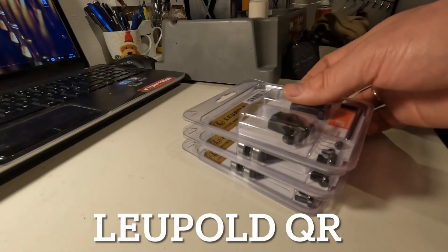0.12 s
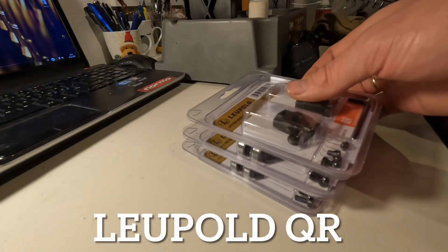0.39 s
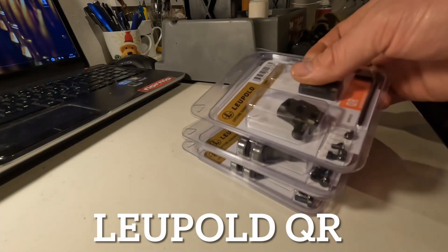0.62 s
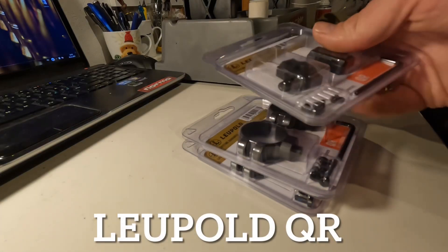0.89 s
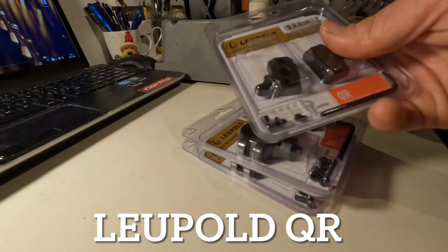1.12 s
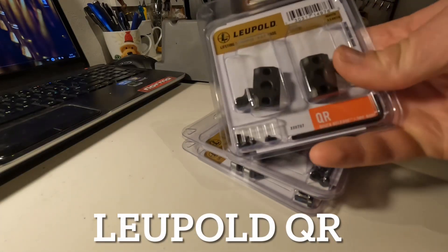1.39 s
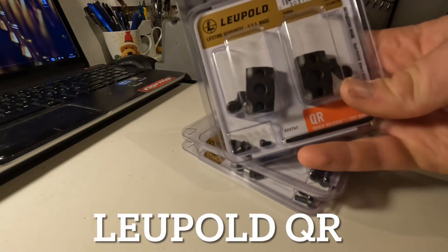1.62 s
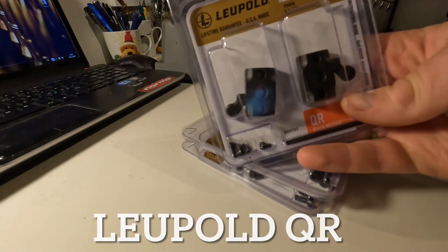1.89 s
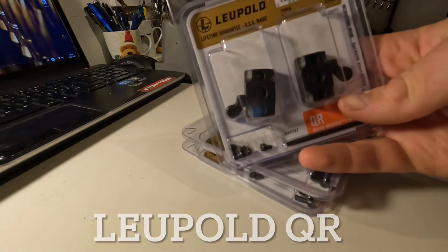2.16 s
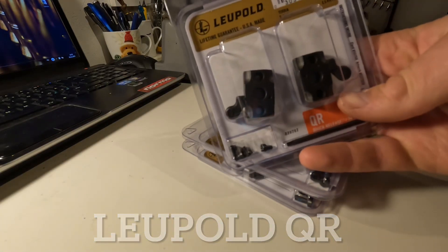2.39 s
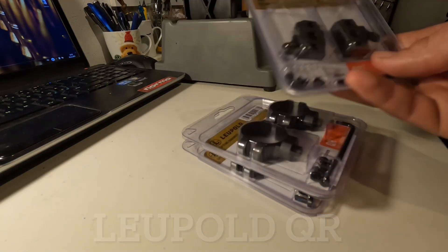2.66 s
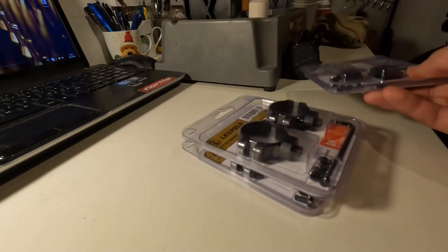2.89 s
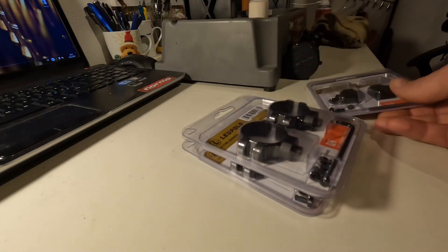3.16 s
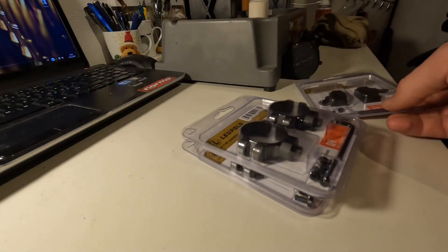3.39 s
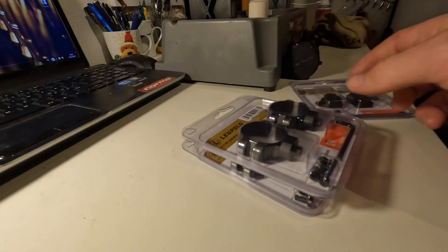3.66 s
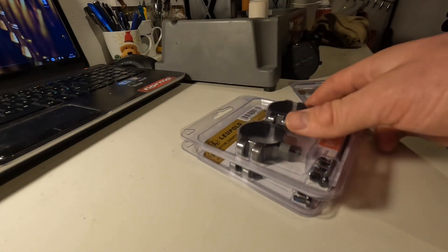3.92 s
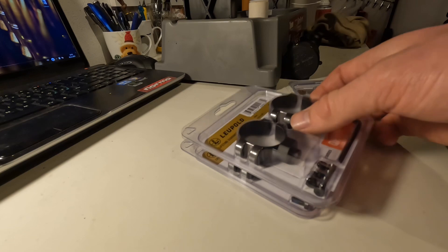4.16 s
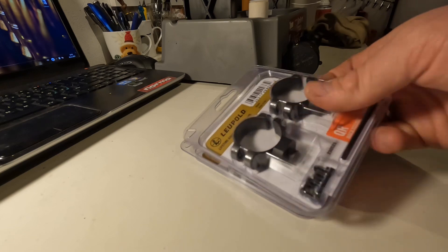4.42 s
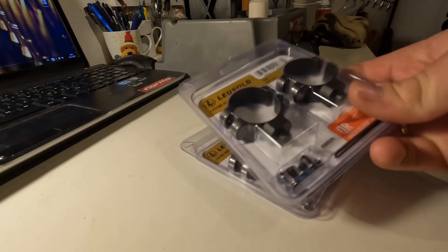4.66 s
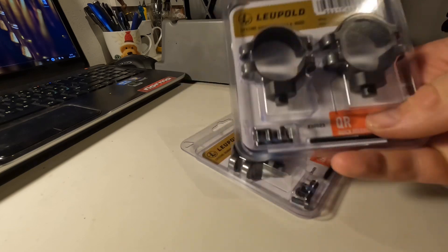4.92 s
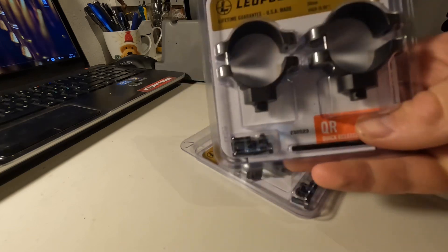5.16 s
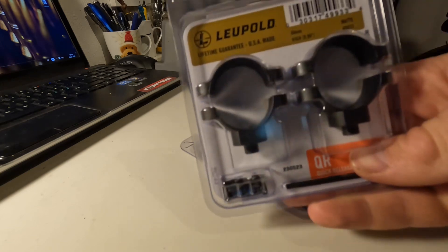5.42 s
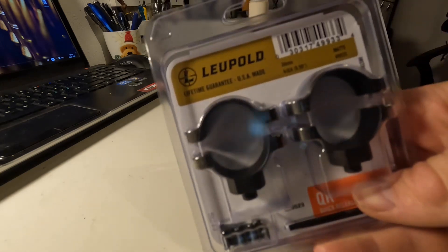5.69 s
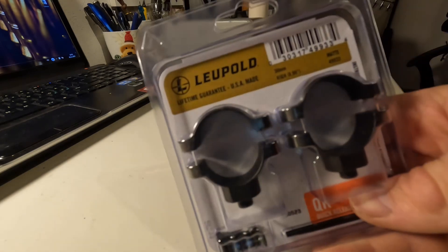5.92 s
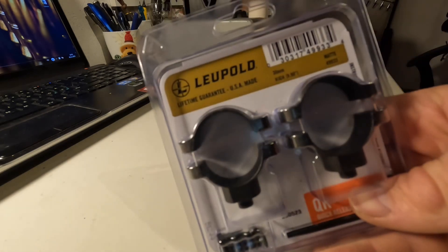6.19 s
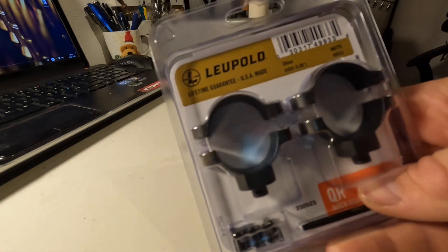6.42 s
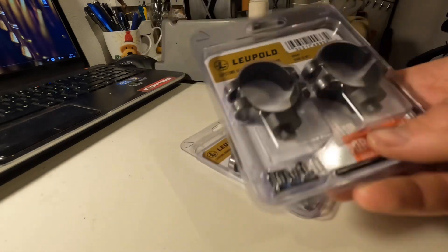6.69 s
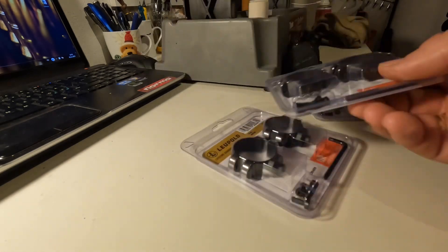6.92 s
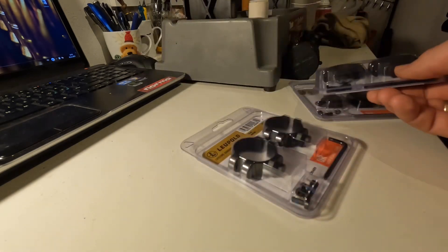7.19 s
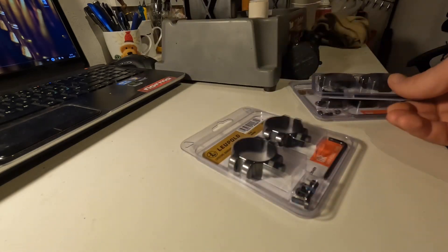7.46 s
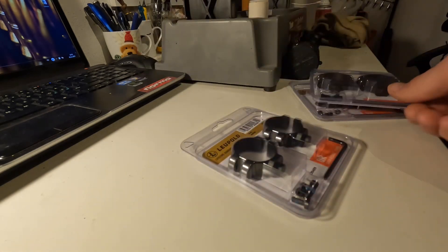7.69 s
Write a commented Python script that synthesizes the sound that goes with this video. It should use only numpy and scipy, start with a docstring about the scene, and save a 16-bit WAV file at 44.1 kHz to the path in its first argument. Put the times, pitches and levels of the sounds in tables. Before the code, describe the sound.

A close stereo microphone at a desk in a small, fairly dry room, with faint fan air throughout. From 0 to 0.5 s fingers rub and lightly scrape stiff plastic with small ticks. Between about 0.55 and 1.5 s the pack is lifted and turned in a dense flurry of bright, brittle clicks and crackles with soft desk bumps. This thins to near quiet by 2 s, with a lone click around 2.6. At 3.05 to 3.3 s hard plastic clacks and rubs arrive as it is laid down, then the loudest clack with a deep desk knock at 3.5. From 3.95 to 5 s a second pack is picked up with snaps, scrapes and crackling, leaving a low hum in the desk. It is almost silent from 5.4 to 6.5, then skin rubs softly around 6.65. A sharp clack and thud come at 7.3, and another weighty knock with clicks at 7.65.

```python
"""At a desk, close to a small stereo microphone: stiff plastic blister packs are lifted, turned and laid down.
Panels snap: short runs of slips with one sharp click, heard through the shell's colour and two brief rings.
Fingers and shells rub, crackle and scrape: dense random slips, coloured by plastic and skin.
Knocks ring the desk's modes and its frame hums on at one low pitch, over lumpy low noise from hands and arms.
A fan nearby is coloured noise with two faint wavering tones; sparse reflections make the room."""
import sys
import numpy as np
from scipy import signal
from scipy.fft import rfft, irfft
from scipy.io import wavfile
from scipy.ndimage import uniform_filter1d

SR = 44100
rng = np.random.default_rng(int(sys.argv[2]) if len(sys.argv) > 2 else 0)


def materialize(psi):
    """Save the field psi as 16-bit PCM at rate SR to the path in sys.argv[1].

    A 1-D psi becomes a single channel; in a 2-D psi each row is a channel.
    """
    bounded = np.clip(np.atleast_2d(psi).T, -1, 1)
    quanta = np.round(bounded * 32767).astype(np.int16)
    wavfile.write(sys.argv[1], SR, quanta)


def gain_from_decibels(decibels):
    """Convert decibel values to linear amplitude factors."""
    exponent = np.asarray(decibels, float) / 20
    return 10 ** exponent


N = 344862  # length in samples

# Side of the handled pack and how bright its snaps sound over time.
# Each row: time in seconds, left over right in dB, tilt of the snaps in dB an octave.
PLACE = [(0, -17, -16), (.5, 7, 1.9), (2.6, 0, -8.6), (3, -1, 4), (3.4, -1.5, -1.5), (3.7, 1, 3),
         (4.1, -2, -3.3), (4.5, -2, -1), (5.3, -1, -3.5), (6, 4, -0.5), (6.8, -1.5, -8), (7.3, -1.5, 3.5),
         (7.82, -2, -1)]
# How firmly the fingers work the pack between strokes. Each row: time in seconds, grip in dB.
GRIP = [(0, -73.5), (.2, -64), (.45, -63.5), (.9, -69), (1.7, -70), (1.95, -72.5), (2.5, -89), (2.75, -71),
        (3.5, -60.5), (3.62, -85), (3.93, -77), (4.4, -61.5), (5.1, -67), (5.35, -75.5), (6.4, -71.5),
        (6.7, -64), (7.2, -68), (7.6, -61), (7.82, -73)]
# Colour of the plastic shell. Each row: frequency in Hz, relative density in dB per Hz.
SHELL = [(180, -43), (300, -8), (543, -11), (1050, -4), (1420, -5.5), (1620, -6.5), (1970, -3.5),
         (2440, -0.5), (2930, -5), (3810, -4.5), (7500, -22), (8990, -21.5), (15500, -39.5)]


def evened(x):
    """Scales to rms 1."""
    return x / np.sqrt(np.mean(x ** 2) + 1e-20)


def read(points, hz):
    """Reads a table along log frequency."""
    f, value = np.transpose(points)
    return np.interp(np.log(hz + 1), np.log(f + 1), value)


def curves(rows):
    """Every column of a table at every sample."""
    s, *columns = np.transpose(rows)
    return [np.interp(np.arange(N) / SR, s, c) for c in columns]


def add(mix, s, sound):
    """Mixes a sound in at time s."""
    part = mix[max(round(s * SR), 0):][:len(sound)]
    part += sound[:len(part)]


def ring(x, hz, width_hz):
    """One resonance of gain 1 at its centre."""
    return signal.lfilter(*signal.iirpeak(hz, hz / max(width_hz, 1), SR), x)


def colour(points, tilt_db=0):
    """Causal impulse response of a spectrum, tilted per octave about 2 kHz."""
    hz = np.abs(np.fft.fftfreq(4096, 1 / SR))
    level_db = read(points, hz) + tilt_db * np.log2((hz + 50) / 2000)
    log_gain = np.log(gain_from_decibels(np.maximum(level_db, -100)))
    minimum_phase = -signal.hilbert(log_gain).imag
    return np.fft.ifft(np.exp(log_gain + 1j * minimum_phase)).real[:1024]


def snaps():
    """A panel flips: quick slips swell to one sharp click and die; two short rings over the shell's colour."""
    # Each row: time of the click in seconds, peak in dB at the pack, ring of the large panel in Hz,
    # ring of a small dome in Hz, dome over panel in dB.
    snap_rows = [(.257, -40, 1840, 5700, 9), (0.329, -52, 1400, 6900, 6), (0.408, -40.5, 1760, 4070, 20),
                 (.428, -39.5, 1410, 2150, -20), (.444, -39, 880, 2580, -17), (.565, -32.5, 1370, 3070, -3),
                 (.572, -33.5, 610, 3220, -17), (.625, -39, 1350, 3700, -17),
                 (.648, -31.5, 1170, 3460, -17), (.712, -29, 760, 2450, -9), (.724, -27, 1240, 2600, -3),
                 (.737, -21.5, 696, 2600, 3), (.767, -30, 1040, 2410, -22), (0.8, -34, 866, 3140, -13),
                 (.813, -21.5, 1340, 3360, 5.5), (0.88, -28.5, 1170, 4140, 17),
                 (.891, -27.5, 930, 3470, 8.5), (.991, -26.5, 1190, 2600, 4), (1, -31, 1000, 2840, -17),
                 (1.051, -44, 1210, 4770, 24), (1.124, -27.5, 800, 2560, -2), (1.149, -31, 1430, 3290, 21),
                 (1.176, -32.5, 690, 4540, 6), (1.187, -26.5, 1380, 4050, 21),
                 (1.204, -35.5, 1960, 2770, 25), (1.299, -31.5, 830, 2700, 0.5),
                 (1.417, -41.5, 740, 2770, -14), (1.438, -33.5, 1400, 4040, 55),
                 (1.529, -32.5, 575, 2120, -6), (1.587, -45, 1650, 3240, -10),
                 (1.625, -41.5, 1630, 3060, -12), (1.708, -41.5, 1240, 3950, 13),
                 (1.844, -50.5, 610, 2590, -30), (1.892, -45.5, 600, 5350, -7),
                 (1.966, -50.5, 1540, 2190, -37), (2.58, -32.5, 1480, 2530, 10),
                 (2.849, -33, 1410, 3160, 0), (2.919, -40.5, 1370, 2870, -12.5),
                 (2.931, -46, 1120, 2170, -23), (3.05, -12, 1330, 2170, -23.5),
                 (3.058, -21, 1330, 2300, -16.5), (3.075, -26.5, 1060, 3450, -19),
                 (3.096, -25, 980, 2360, 1), (3.188, -21, 1610, 2340, -11), (3.206, -32, 490, 2300, -18),
                 (3.276, -16.5, 1280, 2400, -2), (3.283, -23, 1450, 2600, -31),
                 (3.304, -26, 1260, 2490, -8), (3.429, -33.5, 980, 2340, -14),
                 (3.449, -30, 1020, 2600, -20), (3.474, -24.5, 1000, 3020, -4),
                 (3.488, -20.5, 1040, 3030, -5), (3.5125, -4, 1210, 2800, 6.5),
                 (3.941, -39.5, 1210, 2580, 1), (3.967, -28, 760, 2030, 5), (4.015, -28.5, 880, 2940, 15),
                 (4.034, -24, 1050, 3270, -3), (4.05, -23.5, 590, 3280, 0), (4.058, -29, 465, 2150, -12),
                 (4.092, -40, 580, 5100, -5), (4.137, -38.5, 1670, 2920, -4), (4.202, -25.5, 1460, 3240, 6),
                 (4.225, -22.5, 990, 1950, -7), (4.303, -43, 1210, 3700, 37), (4.338, -40, 2010, 2140, -9),
                 (4.373, -39.5, 600, 2260, -1), (4.44, -37, 1100, 2920, 1), (4.477, -32, 900, 3780, -15),
                 (4.493, -25.5, 965, 3980, 27), (4.511, -29, 1040, 3200, -7), (4.567, -41, 1120, 3620, -14),
                 (4.581, -34, 1050, 3630, -2), (4.636, -39, 1240, 3380, 15), (4.719, -28, 970, 3500, 14),
                 (4.75, -26.5, 860, 2470, -3), (4.864, -40.5, 1263, 4800, -5), (4.872, -32, 1220, 2330, 10),
                 (4.884, -22.5, 1030, 3670, 27), (4.957, -39, 1230, 2730, 5), (5.118, -48, 1380, 2470, 14),
                 (5.133, -33.5, 1086, 3010, 7.5), (5.24, -36.5, 1230, 2920, 6),
                 (5.284, -46, 1228, 2240, -4), (5.355, -44.5, 1434, 3500, -1),
                 (5.415, -49.5, 960, 2030, -35), (6.146, -46, 700, 3000, -10.5),
                 (6.95, -39.5, 875, 2226, -38), (6.967, -43, 1220, 3920, -20),
                 (7.316, -11.5, 1420, 3570, 4.5), (7.332, -19.5, 1440, 2440, -8),
                 (7.348, -28, 1370, 3400, -13), (7.369, -25.5, 875, 2830, -20),
                 (7.491, -30, 1760, 2700, -21), (7.511, -36.5, 1670, 2480, 20), (7.62, -30, 1020, 2120, 14),
                 (7.636, -23.5, 1030, 2030, -15), (7.646, -28.5, 960, 2480, -27),
                 (7.663, -47, 576, 2420, -2)]
    slip_t60_s, dull_per_db = 0.022, 0.5  # harder snaps move more shell and sound duller: dB an octave per dB
    out, t, bright_db = np.zeros(N), np.arange(5000) / SR - 0.012, curves(PLACE)[1]
    swell_and_decay = gain_from_decibels(-60 * np.where(t < 0, -t / (0.37 * slip_t60_s), t / slip_t60_s))
    for s, db, panel_hz, dome_hz, dome_db in snap_rows:
        slips = rng.standard_normal(len(t)) * gain_from_decibels(5.08 * np.minimum(rng.exponential(1, len(t)), 4))
        drive = 0.19 * evened(slips) * swell_and_decay
        drive[np.argmax(t >= 0)] += 1  # the click
        tilt_db = 0.24 * (dome_db + 6.0) - dull_per_db * (db + 29) + bright_db[round(s * SR)]
        broad = signal.oaconvolve(drive, colour(SHELL, tilt_db))[:len(t)]
        panel = ring(ring(drive, panel_hz, 0.22 * panel_hz), panel_hz, 1.7 * panel_hz)
        dome = ring(ring(drive, dome_hz, 810), dome_hz, 1080)
        sound = 1.9 * evened(broad) + gain_from_decibels(-dome_db / 2) * evened(panel) + gain_from_decibels(dome_db / 2) * evened(dome)
        add(out, s + t[0], gain_from_decibels(db) * sound / abs(sound).max())
    return out


def grit(count, clump_db, spread_db):
    """Dense tiny slips of uneven size, in clumps."""
    clumps = evened(uniform_filter1d(rng.standard_normal(count), 300))
    size_db = clump_db * clumps + spread_db * np.minimum(rng.exponential(1, count), 5)
    return rng.standard_normal(count) * gain_from_decibels(size_db)


def strokes():
    """Levels of shell and skin: the steady grip plus a swell for each stroke, summed as power."""
    # Single rubs and rattles. Each row: time of the peak in seconds, rise in seconds, fall in seconds,
    # shell level in dB, skin level in dB.
    stroke_rows = [(0.127, .05, 0.08, -47.5, -41), (.274, 0.061, 0.072, -68, -51.5),
                   (.58, .05, 0.14, -61, -55), (.688, 0.54, 0.069, -52.5, -64),
                   (.735, 0.11, 0.37, -48.5, -51), (.88, 0.051, 0.063, -52, -48),
                   (1.003, 0.16, 0.14, -54.5, -52), (1.14, 0.13, 0.48, -57, -52),
                   (1.312, 0.087, 0.038, -64, -67), (1.432, 0.17, 0.19, -57.5, -61.5),
                   (1.537, 0.15, 0.22, -60, -57), (1.74, 0.36, 0.16, -86, -62),
                   (2.59, 0.16, 0.31, -58, -57.5), (2.93, 0.65, 0.2, -62, -61.5),
                   (3.061, 0.03, 0.09, -34, -46), (3.198, 0.025, 0.055, -42, -55),
                   (3.296, 0.055, 0.082, -39, -51), (3.467, 0.34, 0.041, -48.5, -79),
                   (3.52, 0.12, 0.15, -31.5, -67), (4.042, 0.11, 0.033, -38.5, -46.5),
                   (4.226, 0.017, 0.04, -33, -64), (4.494, 0.13, 0.072, -51.5, -48),
                   (4.755, 0.32, 0.051, -55.5, -51.5), (4.93, 0.074, 0.6, -73, -63.5),
                   (6.646, 0.14, 0.1, -52.5, -48.5), (6.779, 0.28, 0.1, -58.5, -54),
                   (6.959, 0.3, 0.072, -59, -60.5), (7.35, 0.03, 0.061, -32, -64),
                   (7.508, 0.039, 0.33, -58, -54.5), (7.655, 0.1, 0.057, -36.5, -46)]
    depth_db = 32  # a stroke is this far down one rise before and one fall after its peak
    t, grip = np.arange(N) / SR, gain_from_decibels(curves(GRIP)[0])
    shell, skin = grip ** 2, (grip * gain_from_decibels(-3)) ** 2
    for s, rise, fall, shell_db, skin_db in stroke_rows:
        swell_db = -depth_db * np.where(t < s, (s - t) / max(rise, 0.005), (t - s) / max(fall, 0.005))
        shell = shell + gain_from_decibels(2 * (shell_db + swell_db))
        skin = skin + gain_from_decibels(2 * (skin_db + swell_db))
    return np.sqrt(shell), np.sqrt(skin)


def rub():
    """Slips heard through the shell; skin sliding on plastic hisses above."""
    # Resonances of the rubbed shell. Each row: frequency in Hz, width in Hz, gain in dB.
    shell_rings = [(1060, 1300, 15.5), (2470, 12, 16.5), (4014, 1440, -30)]
    # Colour of skin on plastic. Each row: frequency in Hz, relative density in dB per Hz.
    skin_colour = [(1500, -41), (3500, 7), (6000, -3), (9000, -9.5), (11500, -14.5), (15500, -36)]
    shell_level, skin_level = strokes()
    slips = grit(count=N, clump_db=2.5, spread_db=4.0)
    # neighbouring rings have opposite sign
    rings = sum((-1) ** k * gain_from_decibels(db) * ring(slips, hz, width) for k, (hz, width, db) in enumerate(shell_rings))
    body = evened(signal.oaconvolve(slips, colour(SHELL, -0.086))[:N]) + 0.5 * evened(rings)
    # the thick shell carries little treble
    body = signal.sosfilt(signal.butter(2, 4500, fs=SR, output="sos"), body)
    skin_slips = slips + 4.0 * grit(count=N, clump_db=1.0, spread_db=4.0)
    skin = signal.oaconvolve(skin_slips, colour(skin_colour))[:N]
    return shell_level * evened(body) + skin_level * evened(skin)


def crackle():
    """Small chance ticks of the flexing shell, each through one short ring, as loud as the grip is firm."""
    ticks_per_s = 140
    size_db = 18 + curves(GRIP)[0] + 4.5 * np.minimum(rng.exponential(1, N), 3)
    ticks = gain_from_decibels(size_db) * (rng.random(N) < ticks_per_s / SR)
    spot = rng.integers(0, 6, N)  # which of six pitches each tick excites
    out = np.zeros(N)
    for k, hz in enumerate(np.geomspace(800, 4500, num=6)):
        out += 3 * ring(ring(ticks * (spot == k), hz, 0.28 * hz), hz, 0.49 * hz)
    return out


def scrapes():
    """An edge slides and sings: slips through one gliding resonance, wider for a higher starting pitch."""
    # Each row: start in seconds, length in seconds, level in dB, pitch at the start in Hz, at the end in Hz.
    scrape_rows = [(0.09, 0.068, -45.5, 3110, 2740), (0.098, 0.07, -52.5, 1660, 1530),
                   (0.346, .06, -58.5, 1510, 1670), (.6, 0.06, -56, 3800, 4200),
                   (4.559, 0.035, -60, 1075, 1140), (3.979, .06, -52.5, 3350, 3020),
                   (4.607, 0.11, -51, 3540, 3680), (4.699, 0.092, -61, 5270, 5200),
                   (4.857, .064, -61.5, 1200, 990), (4.93, 0.091, -62.5, 1055, 1220),
                   (6.632, 0.05, -58, 5630, 5650)]
    out = np.zeros(N)
    for s, length, db, start_hz, end_hz in scrape_rows:
        slips = grit(count=12000, clump_db=2.0, spread_db=-0.5)[:round(length * SR)]
        turn = np.exp(2j * np.pi * np.cumsum(np.linspace(start_hz, end_hz, len(slips))) / SR)
        r = np.exp(-np.pi * 0.2 * start_hz / SR)
        # shift the gliding pitch to zero, smooth there, shift back
        tone = (turn * signal.lfilter([1], [1, -2 * r, r * r], slips / turn)).real
        add(out, s, gain_from_decibels(db) * evened(tone) * signal.windows.tukey(len(tone), 0.6))
    return out


def thuds():
    """A soft push sounds a low ring of its own beside the desk's shared modes."""
    # Knocks that reach the desk top. Each row: time in seconds, level in dB (the peak is 5.5 lower),
    # the knock's own low ring in Hz, its t60 in seconds, the shared modes over it in dB.
    thud_rows = [(0.142, -38, 84, 0.19, 5), (0.239, -52, 161, 0.14, -2), (0.432, -44, 74, 0.16, 7),
                 (0.583, -39, 188, 0.34, 5), (0.725, -31.5, 151.5, 0.14, 13), (0.995, -36, 226, 0.15, 2.5),
                 (1.359, -51.5, 203, 0.11, -7), (1.44, -45, 148, 0.26, -2), (1.519, -35, 212, 0.11, -7),
                 (1.833, -47, 191, 0.26, -6.5), (1.891, -37.5, 93, 0.13, -5), (1.979, -44.5, 65.6, 0.1, -4),
                 (3.054, -31.5, 317.5, 0.4, 10), (3.193, -26, 124, 0.2, -3), (3.272, -35.5, 138, 0.22, -9),
                 (3.516, -7, 86, 0.17, -3), (4.041, -24, 89, 0.069, -4.5), (4.202, -32, 92, 0.19, -3.5),
                 (5.231, -46, 193, 0.18, -4), (5.367, -53, 188.5, 0.2, -19), (7.32, -26.5, 114, 0.31, -6),
                 (7.342, -21, 88, 0.14, 0), (7.637, -16.5, 102.2, 0.11, -6), (7.66, -20, 79, 0.15, -5)]
    # Shared modes of the desk top.
    # Each row: frequency in Hz, level in dB, t60 in seconds for a knock of t60 0.11.
    desk_modes = [(75, -13.5, 0.15), (148, -2, 0.17), (211.8, -6, 0.087), (262, -11, .15),
                  (326.3, -12, 0.12), (400, -11, 0.16), (473, -7.5, .12), (569, -7.5, 0.078)]
    tail_db, tail_t60_s = -18.5, 0.96  # the knock's own low ring lingers faintly
    out, t = np.zeros(N), np.arange(30000) / SR
    for s, db, hz, t60, modes_db in thud_rows:
        phase, shift = rng.random((2, len(desk_modes)))
        modes = np.zeros(len(t))
        for (mode_hz, mode_db, mode_t60), p, u in zip(desk_modes, phase, shift):
            decay = gain_from_decibels(mode_db - 60 * t / np.clip(mode_t60 * t60 / 0.11, 0.02, 0.5))
            modes += decay * np.sin(2 * np.pi * (mode_hz * (1 + 0.045 * (u - 0.5)) * t + p))
        decay = gain_from_decibels(-60 * t / np.clip(t60, 0.02, 0.5)) + gain_from_decibels(tail_db - 60 * t / tail_t60_s)
        own = decay * np.sin(2 * np.pi * hz * t)
        soft_onset = 1 - np.exp(-t / 0.0014)
        sound = (gain_from_decibels(modes_db) * evened(modes) + evened(own)) * soft_onset
        add(out, s - 0.003, gain_from_decibels(db - 5.5) * sound / abs(sound).max())
    return out


def sway():
    """One slow mode of the desk frame: each swell of its hum rises, dies slowly, and stops when stilled."""
    # Each row: time at which a swell of the hum starts in seconds, level in dB,
    # seconds until it is stilled.
    sway_rows = [(3.1, -48, 0.11), (3.26, -42, 0.13), (3.49, -30.5, .22), (3.718, -39.5, 0.29),
                 (3.99, -38, 1.6), (7.33, -38.5, 0.16), (7.64, -40, .3)]
    sway_hz, t60_s, rise_s, still_s = 43.3, 2.46, 0.039, 0.032
    t, power = np.arange(N) / SR, np.zeros(N)
    for s, db, free in sway_rows:
        since = np.maximum(t - s, 0)
        stilled = np.exp(-np.maximum(since - free, 0) / still_s)
        power += (gain_from_decibels(db - 60 * since / t60_s) * (1 - np.exp(-since / rise_s)) * stilled) ** 2
    return np.sqrt(2 * power) * np.sin(2 * np.pi * sway_hz * t)


def noise(points, same, patchy_db):
    """Two channels of coloured noise of rms 1 with drifting patches; same gives left-right likeness by Hz."""
    hz = np.fft.rfftfreq(2048, 1 / SR)
    a, b, c, d, patches = rng.standard_normal((N // 512 + 5, 1025, 5)).T
    patches = evened(uniform_filter1d(uniform_filter1d(patches, 14, 0), 8, 1))
    same, left = np.clip(same(hz), -1, 1)[:, None], a + 1j * b
    right = same * left + np.sqrt(1 - same ** 2) * (c + 1j * d)
    z = np.array([left, right]) * gain_from_decibels(read(points, hz)[:, None] + patchy_db * patches)
    return evened(signal.istft(z, nperseg=2048, noverlap=1536)[1][:, :N])


def rumble():
    """Lumpy low noise from hands and arms on the desk."""
    # Each row: time in seconds, level of the low rumble in dB, level of its deepest part in dB.
    rumble_rows = [(0, -84, -77), (.26, -55, -80), (.43, -72, -74), (.67, -49, -87), (1.0, -79, -97),
                   (1.3, -92, -95), (1.59, -59, -88), (1.8, -81, -74), (2.4, -79, -73), (2.95, -80, -86),
                   (3.24, -45, -52.5), (3.8, -59.5, -78), (4.07, -49.5, -67.5), (4.6, -61, -69),
                   (5.36, -79.5, -78), (6.1, -68.5, -82.5), (6.53, -81, -98), (7.2, -72, -90),
                   (7.36, -65.5, -47), (7.71, -48.5, -61)]
    # Colours of the low rumble and the deepest part. Each row: frequency in Hz, relative density in dB per Hz.
    low_colour = [(40, -45), (60, 10), (110, 5), (200, 2.5), (300, -21.5), (500, -53)]
    deep_colour = [(10, -28), (25, 1.5), (50, 3), (80, -44.5)]
    low_db, deep_db = curves(rumble_rows)
    low = noise(low_colour, lambda hz: np.full_like(hz, 0.88), patchy_db=6.0)
    deep = noise(deep_colour, lambda hz: np.ones_like(hz), patchy_db=5.0)
    return gain_from_decibels(low_db) * low + gain_from_decibels(deep_db) * deep


def fan():
    """Air noise with two faint tones that waver together in level and phase."""
    # Colour of the air noise. Each row: frequency in Hz, relative density in dB per Hz.
    air_colour = [(20, 1.5), (60, -9.5), (150, -5.5), (200, -7), (230, -12.5), (295, -9.5), (370, -13.5),
                  (690, -16), (800, -22.5), (1250, -13), (1750, -11.5), (2300, -16), (3000, -22.5),
                  (4200, -31.5), (5900, -27), (15500, -54)]
    # Each row: frequency in Hz, left-right likeness of the air noise (1 is identical).
    likeness = [(60, 0.15), (240, 0.51), (950, 0.78), (3770, 0.72), (15000, 0.78)]
    # Each row: frequency in Hz, rms level in dB about which the tone wavers.
    tone_rows = [(198, -78), (1458, -87)]
    t = np.arange(N) / SR
    waver = evened(uniform_filter1d(rng.standard_normal(N), 9000))
    tones = np.zeros(N)
    for hz, db in tone_rows:
        tones += np.sqrt(2) * gain_from_decibels(db + 2.8 * waver) * np.sin(2 * np.pi * hz * t + 1.4 * waver)
    return gain_from_decibels(-65) * noise(air_colour, lambda hz: read(likeness, hz), patchy_db=2.5) + tones


def room(x):
    """Sparse reflections, each band dying at its own speed; two patterns alternate steadily, 7.3 turns a second."""
    # Each row: frequency in Hz, t60 of the reflections in seconds.
    decay_rows = [(150, .25), (400, .11), (2000, .13), (8000, .1)]
    out, turn = np.zeros((2, N)), 2 * np.pi * 7.3 * np.arange(N) / SR
    for window in (np.sin(turn), np.cos(turn)):
        taps = np.zeros((2, SR // 2))
        # one reflection of random sign in every 20 samples
        at = np.arange(100, SR // 2 - 20, 20) + rng.integers(0, 20, (2, (SR // 2 - 101) // 20))
        np.put_along_axis(taps, at, rng.choice([-1., 1.], at.shape), 1)
        hz, t, z = signal.stft(taps + 0.65 * taps[::-1], SR, nperseg=256)
        decay = gain_from_decibels(-60 * t / np.maximum(read(decay_rows, hz), 0.02)[:, None])
        tail = signal.istft(z * decay, SR, nperseg=256)[1]
        out += signal.fftconvolve((x * window)[None], tail / np.linalg.norm(tail[0]), axes=1)[:, :N]
    return out


def ports(x, pan_db):
    """The two microphone ports hear a near source with a small lead and balance."""
    # Each row: frequency in Hz, radians by which the left port leads.
    lead = [(100, 0.86), (1600, -0.6), (2800, -.6), (5500, -1), (8000, 0.89), (11000, 0.45), (13500, 0.96)]
    half_turn = np.exp(0.5j * read(lead, np.fft.rfftfreq(N, 1 / SR)))
    left = irfft(rfft(x) * half_turn, N) * gain_from_decibels(pan_db / 2)
    right = irfft(rfft(x) / half_turn, N) / gain_from_decibels(pan_db / 2)
    return np.array([left, right])


def scene():
    """Packs in the room, desk through its frame, fan all round."""
    packs = snaps() + rub() + crackle() + scrapes()
    desk = thuds() + gain_from_decibels([[-1.3], [1.3]]) * sway() + rumble()
    return ports(packs, curves(PLACE)[0]) + gain_from_decibels(-7.5) * room(packs) + desk + fan()


def top_cut(x):
    """Nothing passes above the cut-off."""
    return signal.sosfilt(signal.butter(12, 15820, fs=SR, output="sos"), x)


def record(dry):
    """Microphone colour, widening stereo, gain control that sinks after a loud blow and creeps back."""
    # Colour of the microphone. Each row: frequency in Hz, gain in dB.
    mic = [(20, -0.5), (600, 1), (780, 1.5), (1400, 3), (3400, -4), (4300, -6.5), (5300, -1.5), (8000, -3),
           (12500, -2.5), (14500, -2), (16000, -32)]
    # The stereo image opens. Each row: time in seconds, gain of the side signal in dB.
    width = [(0, -28), (1.2, -20), (2, -15), (2.8, -5), (3.4, 0), (7.82, 3)]
    heard = signal.oaconvolve(dry, colour(mic)[None], axes=1)[:, :N]
    mid = (heard[0] + heard[1]) / 2
    side = (heard[0] - heard[1]) / 2 * gain_from_decibels(curves(width)[0])
    power_db = 10 * np.log10(abs(uniform_filter1d(mid ** 2, 800)) + 1e-12)
    fall = np.arange(N) * 9.1 / SR  # the held peak level sinks by 9.1 dB a second
    held_db = np.maximum.accumulate(power_db + fall) - fall
    over_db = np.maximum(held_db + 20.5, 0)  # excess over -20.5 dB
    late_db = signal.lfilter([1 / 2500], [1, 1 / 2500 - 1], over_db)  # the control lags by about 2500 samples
    return top_cut(np.array([mid + side, mid - side]) / gain_from_decibels(0.56 * late_db))


dry = scene()
out = record(dry)
materialize(out)
```